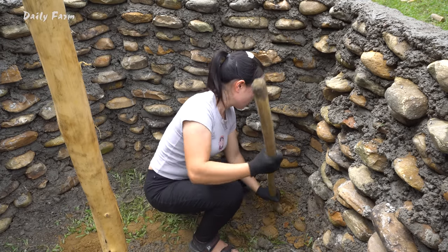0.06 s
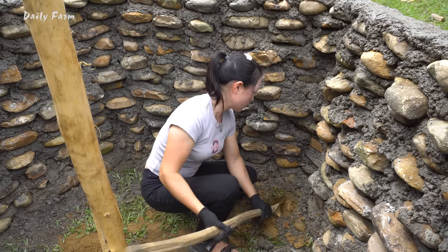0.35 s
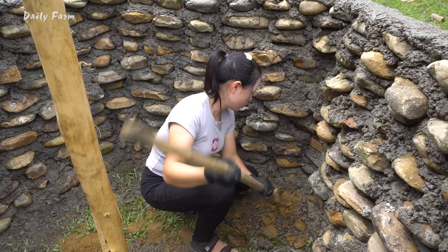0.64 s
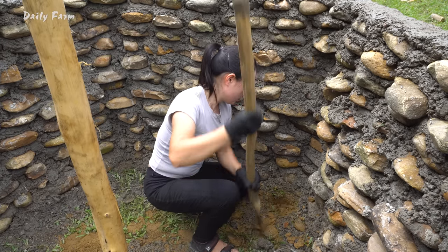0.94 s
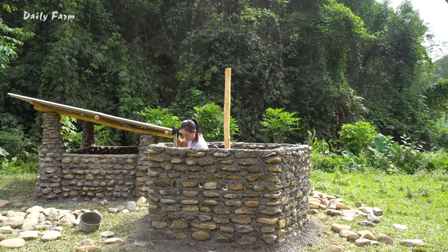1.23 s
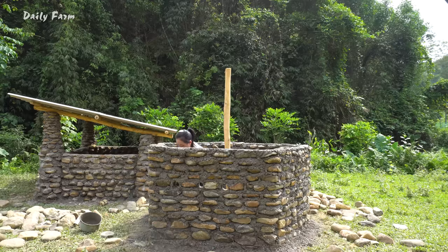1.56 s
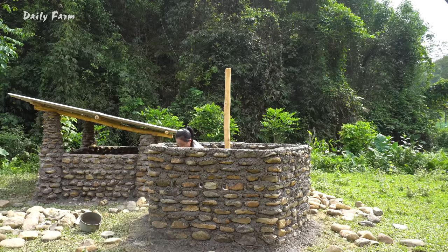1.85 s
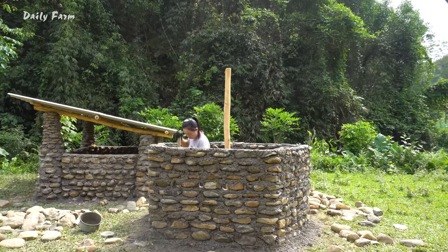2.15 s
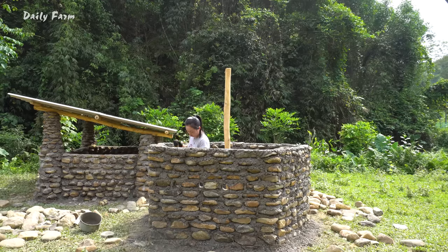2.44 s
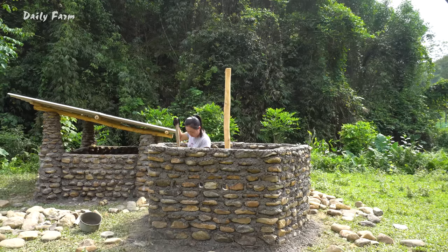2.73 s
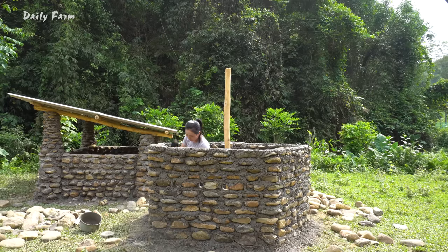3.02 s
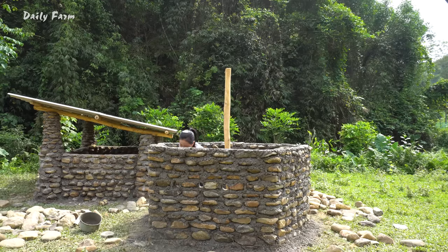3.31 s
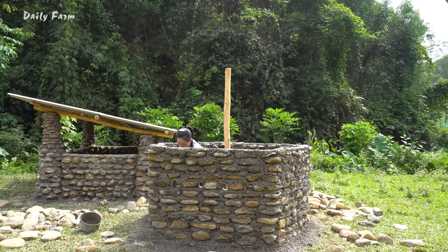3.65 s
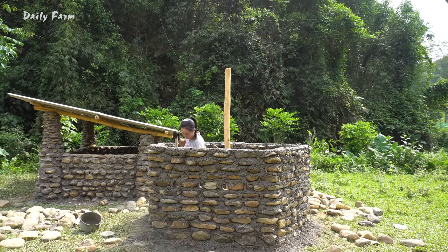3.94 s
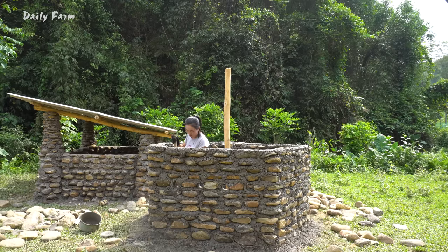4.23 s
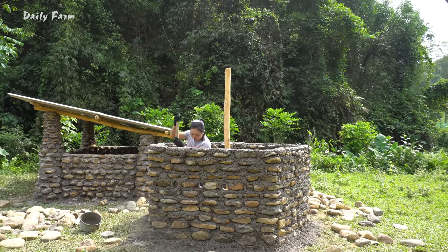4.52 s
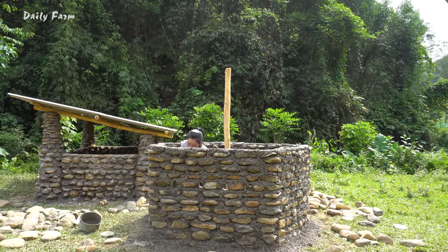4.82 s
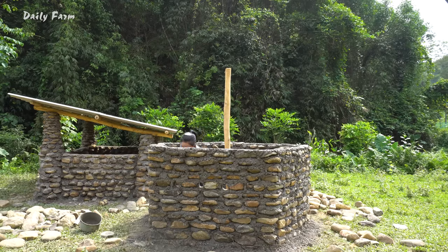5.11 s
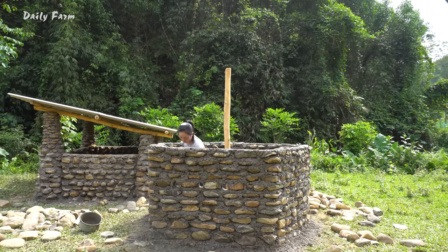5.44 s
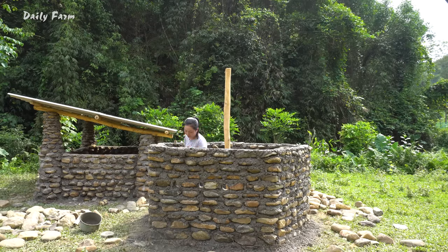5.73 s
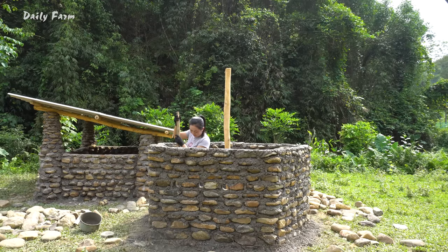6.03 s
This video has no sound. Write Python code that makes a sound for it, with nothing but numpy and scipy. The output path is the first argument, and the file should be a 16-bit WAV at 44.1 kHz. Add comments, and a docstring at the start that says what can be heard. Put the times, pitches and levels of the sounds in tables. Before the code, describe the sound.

A steel-tipped pole stabs into gritty soil close by, then muffled thuds continue at a distance amid birds and insects.

```python
"""A sharp, gritty stab comes first: a steel-tipped wooden pole driven into soil, close to the microphone
inside a round stone wall. Grit rings the tip, a buried stone knocks, the shaft hums, loosened clods drop.
Then the microphone is out on the meadow, where the wall muffles the blows. Birds whistle and chirp
at the forest edge, insects buzz, and a far engine hums under a hiss of leaves."""
import sys
import numpy as np
from scipy import signal
from scipy.fft import rfft, irfft, next_fast_len
from scipy.io import wavfile
from scipy.ndimage import map_coordinates

SR = 44100
rng = np.random.default_rng(int(sys.argv[2]) if len(sys.argv) > 2 else 0)


def pcm_store(signal):
    """Save signal as 16-bit PCM."""
    levels = np.round(np.clip(np.atleast_2d(signal), -1, 1) * 32767)
    wavfile.write(sys.argv[1], SR, levels.astype(np.int16).T)


N = 276507
ON_MEADOW_S = 1.12  # from here on the microphone stands outside the wall

# spectra of the distant rumble and the leaves: frequency_hz, level_db
RUMBLE_SPECTRUM = [(20, -21), (40, -3.5), (100, 1.5), (180, -4), (300, -10), (600, -14.5), (1200, -20.5),
                   (2500, -24), (8000, -37.5)]
LEAF_SPECTRUM = [(300, 7.5), (1200, 3), (3200, 0.5), (6000, -1), (8500, -3), (10000, -4), (15500, -7)]
# the far engine's second order, out on the meadow: time_s, level_db
ENGINE_SWELL = [(1.15, -54.5), (1.71, -55.5), (2.97, -59.5), (5.03, -46.5), (6.23, -46), (6.27, -48)]
# steady insects all around: pitch_hz, spread_hz, inside_db, meadow_db, left_over_right_db
INSECT_CHORUS = [(4666, 205, -64, -63, -1), (7280, 320, -63, -67.5, 2.5), (8380, 210, -73, -75, 3)]
# nearer insects, each repeating one call: pitch_hz, length_s, gain_db, starts_s
INSECT_TRILLS = [(6850, 0.08, -59, [.44, .65]), (4800, .39, -58, [1.68, 2.74, 3.745, 5.675]),
                 (7800, .17, -65.5, [1.11, 2.43, 2.77, 3.11, 4.35, 4.71])]

# a songbird at the forest edge: start_s, length_s, from_hz, to_hz, gain_db, direct_gain_db
BIRD_WHISTLES = [(1.112, 0.06, 4730, 4597, -48, -6), (1.12, 0.02, 4260, 4130, -58, 3),
                 (1.24, 0.135, 5593, 5668, -49, -1.5), (4.236, 0.043, 4150, 3860, -65.5, 6),
                 (4.322, 0.058, 3220, 3127, -54.5, -3), (4.547, 0.053, 3624, 3508, -51.5, 6.5),
                 (4.651, 0.12, 4303, 4443, -46.5, 6), (4.797, 0.13, 5790, 5380, -45.5, 6.5)]
# wavering calls from deep in the forest: start_s, pitch_hz, gain_db
FAR_BIRD_CALLS = [(2.42, 3470, -67.5), (3.73, 2894, -71), (4.04, 2310, -70)]
# short rising calls: start_s, gain_db
BIRD_PEEPS = [(.213, -54.5), (.583, -63.5), (.72, -63), (.952, -57), (1.073, -65)]
# chirp shapes: length_s, from_hz, turning_hz, arc_rad
PEEP, SLUR = (0.039, 3030, 3700, 1.49), (0.081, 4700, 2590, 1.2)
DIVE, CLIMB = (0.03, 6950, 3780, 1.35), (0.06, 2480, 4420, 2.45)

# echoes of the forest, the leaves around the perch and the stone wall: frequency_hz, t60_s
FOREST_DECAY = [(200, 0.35), (3000, 1), (6000, 0.75), (12000, 0.17)]
FOLIAGE_DECAY = [(1000, 0.13), (8000, 0.11)]
WALL_DECAY = [(100, 0.17), (1000, 0.16), (4000, 0.1), (14000, 0.089)]
# the path over the wall to the meadow: frequency_hz, gain_db
OVER_WALL_RESPONSE = [(300, 1), (800, -3), (1150, 3.5), (1500, -3.5), (2450, 4.5), (3500, 6), (5000, 2),
                      (8000, -3), (14000, 1)]
# spectra of muffled tamping, crumbling earth and crushed grit: frequency_hz, level_db
THUD_SPECTRUM = [(50, -3), (130, -2), (195, 10.5), (300, -22.5), (460, -9.5), (900, -30), (3000, -39)]
EARTH_SPECTRUM = [(60, -30), (220, 6.5), (350, -25), (600, 2), (850, -4), (1300, -10), (2200, -8.5),
                  (3100, -7), (4000, -15.5), (4650, -12), (6000, -20), (9500, -21.5), (11500, -19),
                  (16000, -29)]
GRIT_SPECTRUM = [(80, 0), (300, -1.5), (780, 11), (1000, 1), (1400, 5), (3000, 1), (4000, 2.5), (5500, -3),
                 (9000, 0.5), (12000, -14), (16000, -27)]
# resonances of the packed floor and the steel tip: pitch_hz, width_hz, gain_db
FLOOR_MODES = [(242, 41, 2), (598, 81, 0.5), (770, 110, -2)]
TIP_MODES = [(1165, 40, -15), (1440, 470, -4.5), (2000, 130, 0), (2466, 70, 5), (3010, 300, -10),
             (3800, 110, -31), (4880, 170, 1.5), (6830, 150, -5.5), (7700, 110, -11), (12200, 3700, -18)]
# low hum of the wooden shaft and, above 1 kHz, the short bright knock of striking a buried stone:
# pitch_hz, gain_db, t60_s
SHAFT_AND_STONE_MODES = [(133.3, -5.5, 0.47), (190.5, -0.5, 0.24), (287, -1.5, 0.052), (392.5, -9.5, 0.24),
                         (460, -12.5, 0.17), (520, -22, .16), (625, -37, 0.25), (728, -19, 0.12),
                         (1246, -1, 0.039), (1377, -8.5, 0.068), (2130, 7, 0.015), (2790, 5.5, 0.024),
                         (3350, -8.5, 0.06)]

# tamping heard from behind the wall: peak_s, level_db, t60_s
TAMPING_THUDS = [(1.546, -44, 0.65), (1.599, -55, 0.18), (3.199, -53, 0.43), (3.25, -58, 0.34),
                 (4.839, -50, 0.54)]
# clods and pebbles land near the microphone: peak_s, gain_db, knock_gain_db
CLOD_LANDINGS = [(.102, -39.5, -13), (0.149, -33.5, -1), (0.183, -32, -8), (0.274, -27.5, -8),
                 (.302, -32.5, 4), (0.316, -23.5, 1), (.346, -18, -1)]
# the pole stops in the ground, close by: start_s, ring_db, thump_db
POLE_BLOWS = [(0.004, -20, -25), (0.91, -43.5, -27)]
# the tip bites, then grinds deeper: peak_s, bite_db, grind_after_s, grind_db, grind_t60_s, ring_gain_db
TIP_STABS = [(0.0045, -11, 0.006, -26.5, 0.045, 0), (0.8857, -35.5, 0.015, -25.5, 0.062, 8.5),
             (4.803, -44.5, 0.018, -49.5, 0.29, 6.5), (5.819, -46.5, 0.006, -40.5, 0.1, 8)]


def amp(db):
    """Decibels to gain."""
    return 10 ** (np.asarray(db) / 20)


def unit(x):
    """Scale to rms 1."""
    return x / np.sqrt(np.mean(x ** 2) + 1e-20)


def along(points, hz):
    """Read (frequency_hz, value) points on a log axis."""
    point_hz, values = np.transpose(points)
    return np.interp(np.log(hz + 1), np.log(point_hz + 1), values)


def wobble(rate):
    """A smooth random curve, rate knots a second."""
    return map_coordinates(rng.standard_normal(int(N * rate / SR) + 4), [np.arange(N) * rate / SR])


def filtered(x, response):
    """Pass x through a complex response of frequency."""
    size = next_fast_len(N + SR // 2)
    return irfft(rfft(x, size) * response(np.fft.rfftfreq(size, 1 / SR)), size)[..., :N]


def coloured(x, spectrum):
    """Shape x by (frequency_hz, gain_db) points."""
    return filtered(x, lambda hz: amp(along(spectrum, hz)))


def resonate(x, modes):
    """Ring x through resonances of alternating polarity."""
    return filtered(x, lambda hz: sum(
        (-1) ** k * amp(db) * 1j * hz * width / (pitch ** 2 - hz ** 2 + 1j * hz * width)
        for k, (pitch, width, db) in enumerate(modes)))


def pan(db):
    """Channel gains that put left db above right."""
    return amp([[db / 2], [-db / 2]])


def add(out, start_s, x):
    """Mix x into out from start_s on."""
    i = max(round(start_s * SR), 0)
    out[..., i:i + x.shape[-1]] += x[..., :N - i]


def burst(peak_s, rise_s, t60_s):
    """An envelope that swells up to peak_s and dies away."""
    t = np.arange(N) / SR - peak_s
    return np.clip(1 + t / rise_s, 0, 1) ** 1.25 * amp(-60 * np.maximum(t, 0) / t60_s)


def grains(rate, side_db):
    """Stereo stream of tiny random fractures, rate a second."""
    mid, side = rng.standard_normal((2, N)) * (rng.random((2, N)) < rate / SR)
    return unit(np.array([mid + amp(side_db) * side, mid - amp(side_db) * side]))


def band(centre_hz, spread_hz):
    """Narrow stereo noise of rms 1."""
    noise = rng.standard_normal((2, N))
    return unit(filtered(noise, lambda hz: 1 / (1 + ((hz - centre_hz) / spread_hz / 2) ** 2) ** 2))


def echoes(x, decay, delay_s):
    """Diffuse reflections in which each frequency dies at its own speed."""
    hz, t, noise = signal.stft(rng.standard_normal((2, SR)), SR, nperseg=256)
    tail = signal.istft(noise * amp(-60 * t / along(decay, hz)[:, None]), SR, nperseg=256)[1]
    tail = np.pad(tail / np.linalg.norm(tail[0]), ((0, 0), (round(delay_s * SR), 0)))
    return signal.fftconvolve(np.atleast_2d(x), tail, axes=1)[:, :N]


def by_position(inside, meadow):
    """For each sample, the value for where the microphone stands."""
    return np.where(np.arange(N) / SR > ON_MEADOW_S, meadow, inside)


def air():
    """Distant rumble, alike in both channels only in the bass, under a hiss of leaves."""
    mid, side = coloured(rng.standard_normal((2, N)), RUMBLE_SPECTRUM)
    side = coloured(side, [(60, -37), (130, -14.5), (290, -3.0), (600, 1.0)])
    rumble = amp(-56 + 0.74 * wobble(5.42)) * unit(np.array([mid + side, mid - side]))
    hiss_db = by_position(inside=-58, meadow=-61) + 0.79 * wobble(3.7)
    hiss = amp(hiss_db) * unit(coloured(rng.standard_normal((2, N)), LEAF_SPECTRUM))
    return rumble + pan(0.8) * hiss


def engine(pitch_hz=47.54):
    """The two lowest orders of a far engine at steady speed; they swell together and waver on the way."""
    swell_db = np.interp(np.arange(N) / SR, *np.transpose(ENGINE_SWELL))
    first_db = -55 + 0.53 * (swell_db - swell_db.mean())
    second_db = swell_db + by_position(inside=-4.5, meadow=0)  # the wall shades the second order
    phase = 2 * np.pi * np.cumsum(pitch_hz * (1 + 0.0084 * wobble(7.1))) / SR
    first = amp(first_db + 0.31 * wobble(4)) * np.sin(phase)
    second = amp(second_db + 0.32 * wobble(5)) * np.sin(2 * phase)
    return np.sqrt(2) * (first + second)


def insects(pulse_hz=27):
    """A steady chorus in narrow bands, with callers pulsing nearer the microphone."""
    out = np.zeros((2, N))
    for hz, spread_hz, inside_db, meadow_db, pan_db in INSECT_CHORUS:
        level_db = by_position(inside_db, meadow_db) + 0.97 * wobble(6.7) + 1.3 * wobble(45)
        out += amp(level_db) * pan(pan_db) * band(hz, spread_hz)
    rasp = np.array([wobble(350), wobble(350)])  # a rasping wing makes narrow noise around its pitch
    for hz, length_s, db, starts_s in INSECT_TRILLS:
        t = np.arange(round(length_s * SR)) / SR
        swell = np.abs(np.sin(np.pi * (t / length_s) ** 0.96)) ** 0.5
        pulses = amp(2.8 * np.cos(2 * np.pi * pulse_hz * t))
        for start_s in starts_s:
            buzz = rasp[:, round(start_s * SR):][:, :len(t)] * np.sin(2 * np.pi * hz * t)
            add(out, start_s, amp(db + 2) * pan(-3) * swell * pulses * buzz)
    return out


def whistle(length_s, from_hz, to_hz, waver):
    """A pure note that settles on its pitch and wavers by a share of it."""
    progress = np.linspace(0, 1, round(length_s * SR))
    hz = to_hz + (from_hz - to_hz) * np.exp(-3.5 * progress)
    hz *= 1 + waver * wobble(110.6)[:len(hz)]
    return np.sqrt(np.abs(np.sin(np.pi * progress))) * np.sin(2 * np.pi * np.cumsum(hz) / SR)


def chirp(length_s, from_hz, turning_hz, arc_rad):
    """A rougher note that sweeps in an arc; past a quarter turn it hooks back."""
    progress = np.linspace(0, 1, round(length_s * SR))
    hz = from_hz + (turning_hz - from_hz) * np.sin(arc_rad * progress ** 1.2)
    hz *= 1 + 0.0234 * wobble(988)[:len(hz)]
    return np.abs(np.sin(np.pi * progress ** 1.06)) * np.sin(2 * np.pi * np.cumsum(hz) / SR)


def swoops(count, start_s=5.129, every_s=0.203, grow_db=2.6):
    """A run of dives and climbs, growing louder: start_s, gain_db, shape."""
    return [(start_s + k * every_s + after_s, db + k * grow_db, shape)
            for k in range(count) for after_s, db, shape in [(0, -57.5, DIVE), (0.032, -55, CLIMB)]]


def birds():
    """Whistles and chirps at the forest edge; far birds reach the microphone mostly as echo."""
    direct, into_forest = np.zeros((2, N))
    whistles = [(start_s, db, direct_db, whistle(length_s, from_hz, to_hz, waver=0.0037))
                for start_s, length_s, from_hz, to_hz, db, direct_db in BIRD_WHISTLES]
    whistles += [(start_s, db, -7, whistle(0.22, hz, hz, waver=0.0262))
                 for start_s, hz, db in FAR_BIRD_CALLS]
    for start_s, db, direct_db, note in whistles:
        add(direct, start_s, amp(db + direct_db) * note)
        add(into_forest, start_s, amp(db) * note)
    peeps = [(start_s, db, PEEP) for start_s, db in BIRD_PEEPS]
    for start_s, db, shape in peeps + [(1.825, -63, SLUR)] + swoops(count=3):
        note = amp(db) * chirp(*shape)
        add(direct, start_s, note)
        add(into_forest, start_s, amp(-6) * note)
    from_perch = amp(-2) * (direct + echoes(direct, FOLIAGE_DECAY, delay_s=0.003))
    return pan(-2.6) * (from_perch + echoes(into_forest, FOREST_DECAY, delay_s=0.015))


def tamping(rise_s=0.0064):
    """Soft thuds, of which only the bass bends over the wall to the meadow."""
    force = sum(amp(db) * burst(peak_s, rise_s, t60_s) for peak_s, db, t60_s in TAMPING_THUDS)
    return force * unit(coloured(grains(rate=14000, side_db=-37), THUD_SPECTRUM))


def clods():
    """Close by, lumps of earth crunch and knock on the packed floor while crumbs and sand trickle."""
    landings = np.array([amp(db - 10) * burst(peak_s, rise_s=0.003, t60_s=0.038)
                         for peak_s, db, _ in CLOD_LANDINGS])
    on_floor = amp([knock_db for *_, knock_db in CLOD_LANDINGS]) @ landings
    crunch = landings.sum(axis=0) * unit(coloured(grains(rate=14000, side_db=-11), EARTH_SPECTRUM))
    knock = amp(15.5) * resonate(on_floor * grains(rate=10000, side_db=-29), FLOOR_MODES)
    lumps = pan(-1.7) * (crunch + knock)
    crumbs = amp(-56) * unit(coloured(grains(rate=470, side_db=-19), EARTH_SPECTRUM))
    sand_spectrum = [(1500, 3), (5000, 7), (11500, -8), (16000, -10)]
    sand = amp(-58) * unit(coloured(grains(rate=2000, side_db=-2), sand_spectrum))
    trickle = burst(0.15, rise_s=0.17, t60_s=2.0) * (crumbs + sand)
    return lumps + trickle + amp(-11.5) * echoes(lumps, WALL_DECAY, delay_s=0.005)


def pole_blows(sag=0.07, settle_s=0.03, ground_hz=74):
    """The ground thumps, a buried stone knocks and the shaft hums; the pitch sags as the soil yields."""
    out, t = np.zeros((2, N)), np.arange(SR // 2) / SR
    yielding_s = t + sag * settle_s * (1 - np.exp(-t / settle_s))
    lean = [(300, -0.065), (1200, -2)]  # pitch_hz, pan_db: only short waves favour the nearer side
    ring = sum(pan(along(lean, hz)) * amp(db - 60 * t / t60_s) * np.sin(2 * np.pi * hz * yielding_s)
               for hz, db, t60_s in SHAFT_AND_STONE_MODES)
    thump = -np.sin(2 * np.pi * ground_hz * t) * amp(-60 * t / 0.11)
    attack = 1 - np.exp(-t / 0.00076)
    for start_s, ring_db, thump_db in POLE_BLOWS:
        add(out, start_s, attack * (amp(ring_db) * ring + amp(thump_db) * thump))
    return out


def steel_tip(bite_rise_s=0.0052, grind_rise_s=0.017):
    """Grit crunches under the tip and rings it; on the meadow it comes over the wall with more echo."""
    pushes = np.array([amp(bite_db) * burst(peak_s, bite_rise_s, 0.28 * t60_s)
                       + amp(grind_db) * burst(peak_s + after_s, grind_rise_s, t60_s)
                       for peak_s, bite_db, after_s, grind_db, t60_s, _ in TIP_STABS])
    on_steel = amp([ring_db for *_, ring_db in TIP_STABS]) @ pushes
    ring = amp(-0.5) * resonate(on_steel * grains(rate=30000, side_db=-7.5), TIP_MODES)
    grit = unit(coloured(grains(rate=19000, side_db=-5.5), GRIT_SPECTRUM))
    stabs = ring + amp(-6.5) * pushes.sum(axis=0) * grit
    near = pan(-0.83) * stabs * by_position(inside=1, meadow=0)
    far = coloured(stabs * by_position(inside=0, meadow=1), OVER_WALL_RESPONSE)
    return near + far + echoes(amp(-16.5) * near + amp(-5.5) * far, WALL_DECAY, delay_s=0.005)


def scene():
    """The digging and the meadow around it, as they reach the microphone."""
    return steel_tip() + pole_blows() + clods() + tamping() + birds() + insects() + engine() + air()


def record(dry, top_hz=15850):
    """The camera keeps nothing above its band limit."""
    return filtered(dry, lambda hz: hz < top_hz)


dry = scene()
out = record(dry)
pcm_store(out)
```